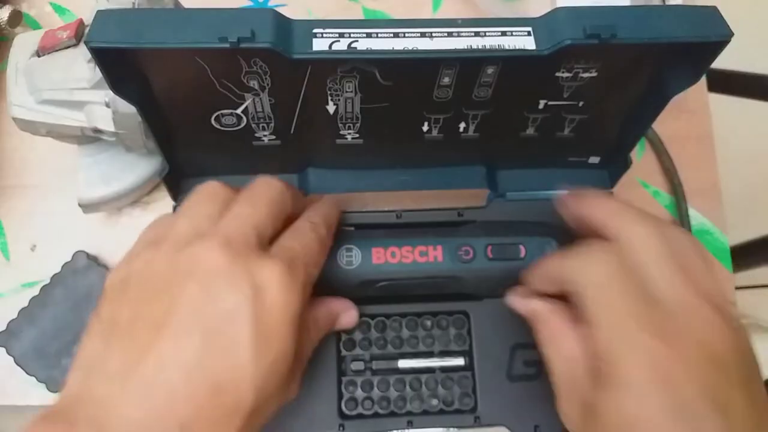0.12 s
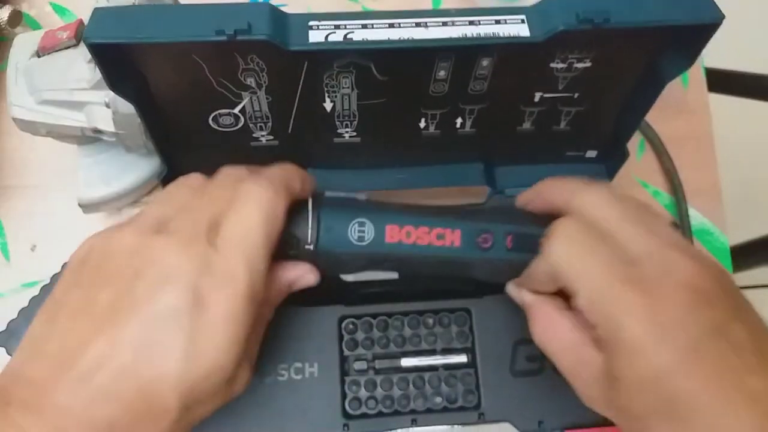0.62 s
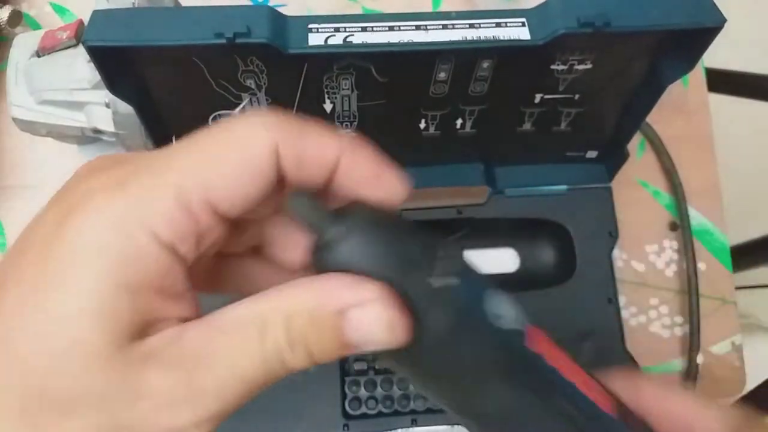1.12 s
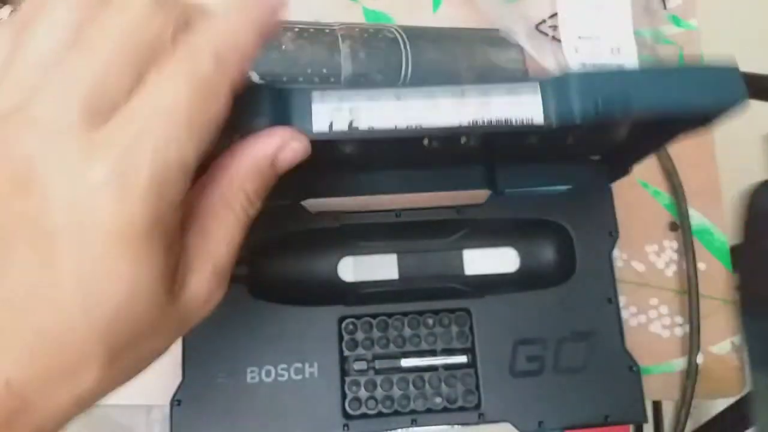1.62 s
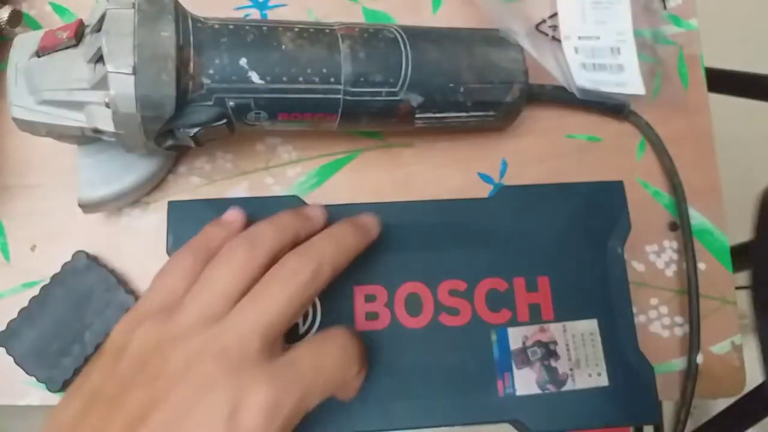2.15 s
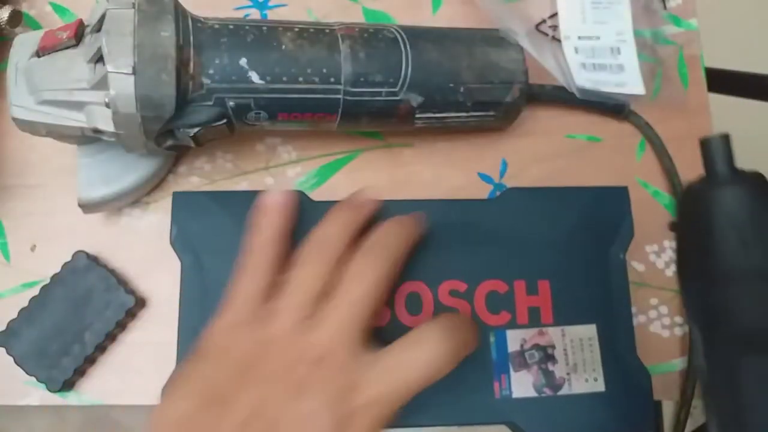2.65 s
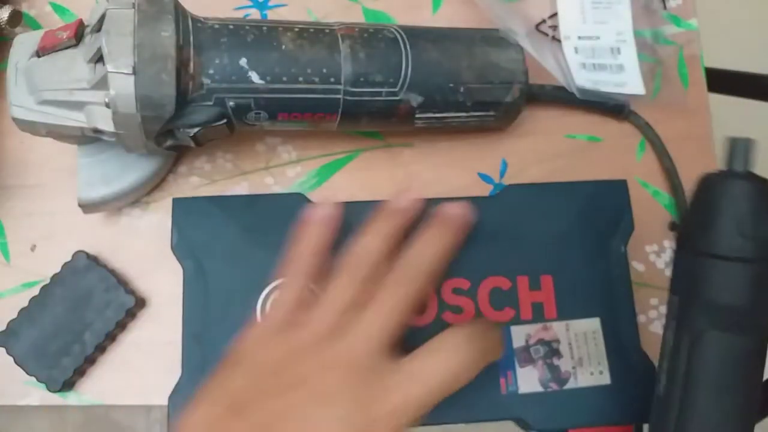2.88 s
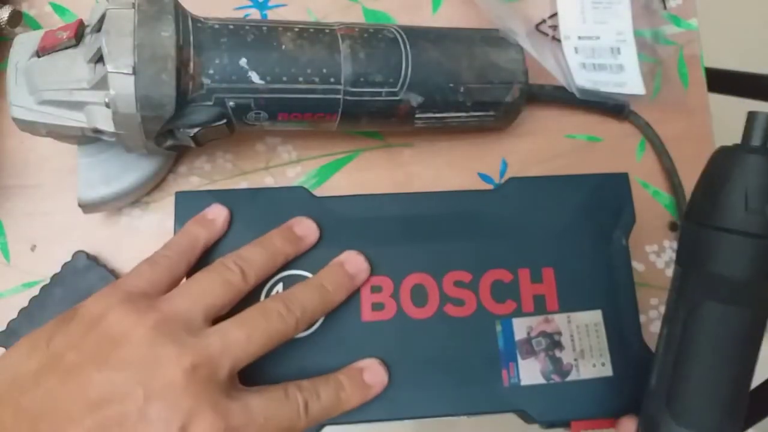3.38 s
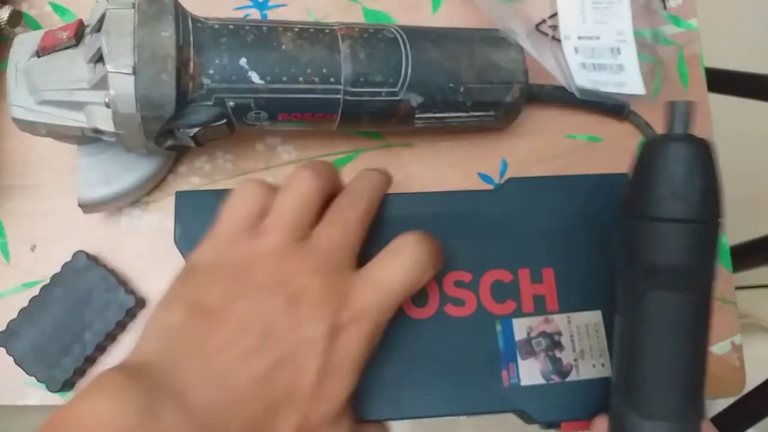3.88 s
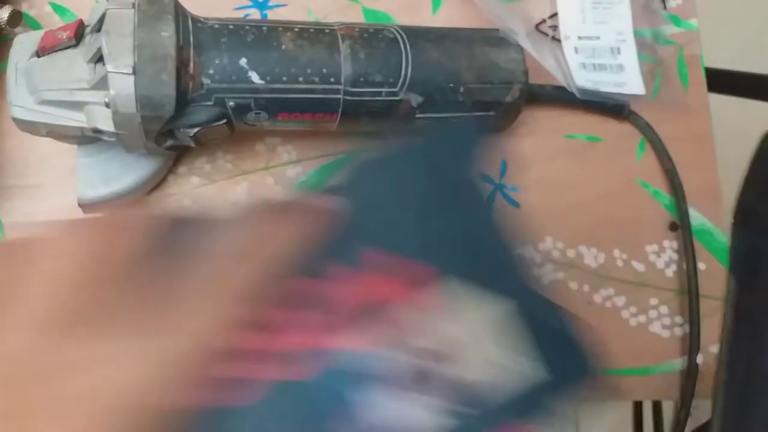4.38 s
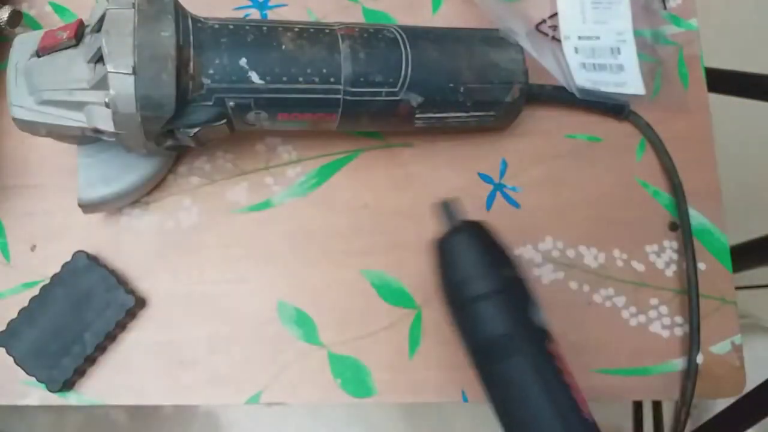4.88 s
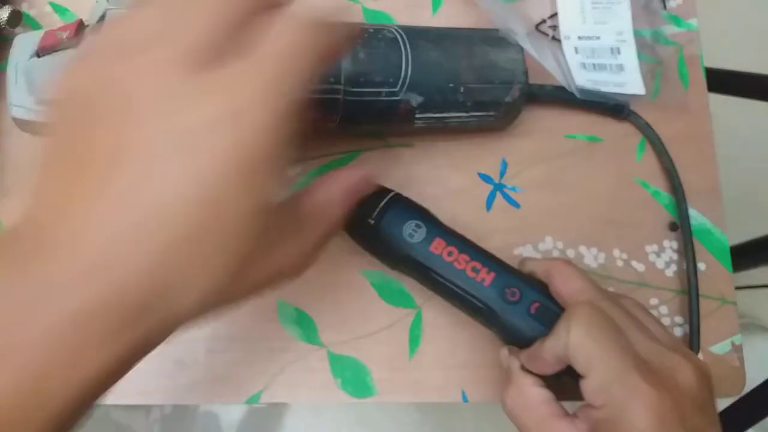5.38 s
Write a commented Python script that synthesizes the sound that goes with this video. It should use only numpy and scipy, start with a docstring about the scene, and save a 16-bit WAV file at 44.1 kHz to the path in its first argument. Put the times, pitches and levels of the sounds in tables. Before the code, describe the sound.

Quiet plastic rustling and small clicks come first, with barely audible thin tones. Then the case lid claps shut, the loudest hit, with a short woody thump. Sparse taps and scuffs lead to a crisp latch snap, a cluster of small clicks as the case is moved away, and two separate knocks on the wooden table. Dry, close phone sound with short room reflections and faint hiss.

```python
"""Handling a hard tool case

A hard plastic tool case is emptied, shut, latched and moved on a wooden table, close to a phone microphone.
Blows and thumps excite damped modes of the case and the table top; scrapes are clumped noise coloured by
the surfaces; rubbing hands and the hiss of the room are shaped noise with drifting patches.
Thin sines waver at the start, a faint stack of overtones squeaks near the end, and sparse decaying
reflections form the answer of a small room."""
import sys
import numpy as np
from scipy import signal
from scipy.fft import rfft, irfft
from scipy.io import wavfile
from scipy.ndimage import uniform_filter1d

SR = 44100
rng = np.random.default_rng(int(sys.argv[2]) if len(sys.argv) > 2 else 0)


def boost_factor(decibels):
    """Convert a level in decibels to a linear amplitude factor."""
    exponent = np.asarray(decibels, float) / 20
    return 10 ** exponent


def dump(signal):
    """Clip the signal to [-1, 1] and save it as 16-bit WAV at the path in sys.argv[1]."""
    limited = np.clip(np.atleast_2d(signal).T, -1, 1)
    pcm = np.round(limited * 32767).astype(np.int16)
    wavfile.write(sys.argv[1], SR, pcm)


N = 243431  # length in samples

# blows on the case: start_s, level_db, treble tick re blow tick_db, centre of the contact centre_hz, ring_t60_s
BLOWS = [(.105, -41, -23, 870, 0.12), (.391, -30.5, -3, 550, 0.043), (.483, -37, -5, 1410, 0.041),
         (0.52, -42, -4, 2000, 0.053), (.764, -47.5, 7.5, 1540, .11), (.979, -47.5, -25, 748, 0.41),
         (1.416, -38.5, -3.5, 2190, 0.05), (1.502, -28.5, -13, 3760, 0.093), (1.978, -25.5, -27, 900, 0.05),
         (1.991, -10.5, -2.5, 4070, .035), (2.000, 5.5, -41, 1580, 0.014), (2.003, -1.5, -26, 770, 0.029),
         (2.008, -20, -30, 980, 0.031), (2.018, -24, -25, 580, 0.039), (2.033, -25, -40, 1100, .1),
         (2.048, -23, -25, 810, 0.053), (2.241, -41.5, -2, 620, 0.19), (2.312, -21.5, -2, 1980, 0.033),
         (2.530, -42, -10, 3770, .04), (2.795, -41.5, -18, 504, 0.06), (3.124, -17, -11.5, 3300, 0.018),
         (3.126, -18.5, -30, 940, 0.024), (3.4, -40.5, -10, 2550, 0.026), (3.515, -24.5, -19, 1400, 0.036),
         (3.522, -24, -8, 2650, 0.051), (3.526, -30, -30, 920, 0.028), (3.694, -22, -10, 950, 0.02),
         (3.954, 2.5, -7.5, 2350, 0.034), (3.956, -18, 2, 1370, 0.11), (4.012, -18, -11, 1300, 0.041),
         (4.017, -18.5, -21, 2680, 0.053), (4.147, -48, -22, 1170, 0.057), (4.208, -36, -15, 4500, 0.023),
         (4.217, -30.5, -11.5, 910, 0.058), (4.217, -29, -20, 2200, .07), (4.24, -36, -21, 2520, 0.044),
         (4.264, -30, -2, 990, .06), (4.277, -26, -8, 2780, 0.026), (4.28, -15, -5, 3560, 0.023),
         (4.318, -18, -6, 2650, 0.014), (4.340, -33, 2, 3180, 0.045), (4.354, -32, -17, 3000, 0.034),
         (4.369, -34, -20, 5000, 0.025), (4.395, -38, -14, 2520, 0.048), (4.453, -44, -22, 2560, .05),
         (4.652, -31.5, -6.5, 3860, 0.042), (4.752, -11.5, -22, 880, 0.033),
         (4.752, -13, -14.5, 2400, 0.066), (4.76, -19.5, -14, 1150, 0.06), (4.831, -17, -30, 2340, 0.016),
         (4.831, -21.5, -40, 810, 0.036), (4.84, -29, -23, 1090, 0.033), (4.856, -24.5, -21, 540, 0.026),
         (5.383, -11, -6.5, 1500, 0.034), (5.387, -25, -14, 3700, 0.026), (5.4, -26.5, -23, 1300, 0.15)]
# scrapes of plastic on plastic or skin: start_s, length_s, level_db, centre_hz, spread_octaves
SCRAPES = [(0.058, 0.086, -60.5, 4200, 0.16), (0.171, 0.05, -50.5, 1300, 1.76),
           (0.358, 0.037, -56, 610, 0.55), (0.453, 0.047, -53, 1200, 1), (0.241, 0.03, -52.5, 6000, 1.8),
           (0.562, 0.033, -46, 3460, 1.9), (1.483, 0.039, -45.5, 3800, 1.8), (1.592, 0.034, -48, 8040, 1.5),
           (1.683, 0.037, -44.5, 10200, .8), (1.874, 0.12, -49.5, 6240, 1.4),
           (2.013, 0.092, -47, 2480, 1.6), (2.273, 0.047, -40, 2460, 1.6), (2.282, 0.014, -39, 2950, 0.11),
           (2.293, 0.023, -39.5, 1300, 0.65), (2.398, 0.023, -52.5, 1770, 1.4),
           (2.518, .016, -50.5, 9000, 1.5), (2.586, 0.16, -57, 7060, 0.7), (2.756, 0.043, -51, 11100, .66),
           (2.887, 0.11, -49.5, 10300, 1), (3.059, 0.085, -51, 1070, 1.4), (3.18, 0.033, -56, 12000, .3),
           (3.359, 0.043, -52.5, 7360, 0.19), (3.575, 0.015, -50, 8000, 1.7), (3.648, 0.012, -47, 4240, 1),
           (3.752, 0.037, -34.5, 1850, 0.69), (3.757, 0.045, -28.5, 970, 0.36),
           (3.806, 0.017, -42, 1070, 0.59), (3.834, 0.09, -49, 1080, 0.8), (3.907, 0.0092, -44, 1570, 0.77),
           (3.947, 0.046, -32.5, 1940, 1.5), (3.971, 0.073, -44, 3000, 1.4),
           (4.001, 0.031, -36.5, 1170, 0.22), (4.269, 0.028, -47, 5000, 0.93),
           (4.337, .066, -57.5, 3930, 0.32), (4.946, 0.054, -61.5, 9000, .54),
           (5.384, 0.032, -54, 1800, 0.28)]
# modes of the case: mode_hz, relative level_db, t60 as a share of the blow's ring t60_ratio
CASE_MODES = [(419.6, 18, 1.25), (600, -17, 0.43), (774, 20, 1.3), (834, 24, 0.55), (985, 15, 0.81),
              (1120, 1, 2.8), (1200, -8.5, 1.2), (1297, -8.5, 1.56), (1300, -11, 3), (1420, 19, 0.54),
              (1626, -17, 0.74), (1990, -6.5, 1), (2082, 19, 1.4), (2227, -16.5, 0.5), (2560, 42, 0.09),
              (3280, 40.5, 0.17), (3380, -18.5, .7), (4280, 14, 1.3), (4870, 18, 0.26)]
# modes of the table top: mode_hz, relative level_db, free t60_s
TABLE_MODES = [(128, -5.5, 0.39), (160.4, 6, 0.12), (214, 2.5, 0.11), (232.8, 3.5, 0.13), (283.6, 5, 0.12),
               (357.3, 5.5, 0.12), (405, 4.5, 0.11)]
# thumps on the table top: start_s, peak_db, pitch of the leading modes spot_hz,
# share of the free ring left by the hands ring_ratio
THUMPS = [(0.766, -41, 166, 0.88), (1.501, -21.5, 133, 0.62), (1.98, -33, 292, 0.87),
          (2.000, -20.5, 290, 0.43), (2.031, -48, 297, 0.57), (2.24, -40, 290, 0.87),
          (2.61, -43.5, 270, 0.38), (2.795, -41.5, 275, 0.43), (2.867, -38.5, 260, 0.39),
          (3.693, -24.5, 182, 0.28), (4.012, -35, 258, 0.35), (4.217, -27.5, 290, 0.52),
          (4.28, -31, 297, 0.45), (4.752, -20.5, 267, 0.5), (4.83, -24.5, 283, 0.32),
          (4.856, -33, 296, 0.3), (5.384, -11.5, 265, 0.29), (5.4, -23, 243, 0.61)]
# pressure of the hands on the case: time_s, rubbing level_db
HAND_PRESSURE = [(0.0, -53.5), (.38, -51), (.7, -53), (1.38, -55.5), (1.55, -49.5), (1.75, -54.5),
                 (1.94, -54), (2.08, -50), (2.3, -50), (2.54, -53), (3.01, -52.5), (3.44, -55.5),
                 (3.95, -46.5), (4.2, -56.5), (4.35, -51), (4.46, -62), (4.9, -62.5), (5.52, -56)]
# relative spectra of the dull rub, the finger hiss, the table rumble, the room hiss and the tick of a blow:
# frequency_hz, density_db (per Hz)
RUB_SPECTRUM = [(90, -44), (150, -1), (300, 1), (600, -3.5), (1800, -8), (5500, -13.5), (9000, -19.5),
                (16000, -15)]
FINGER_HISS_SPECTRUM = [(2000, -9), (4000, 3), (8000, -15), (12000, 3), (16000, -9.5)]
RUMBLE_SPECTRUM = [(30, -40), (50, -36), (80, 4.5), (125, 5.5), (180, -37), (300, -49)]
AIR_SPECTRUM = [(40, 2), (90, -0.5), (300, -11.5), (1000, -3.5), (3000, -10), (7000, -15.5), (12000, -26),
                (16000, -17)]
TICK_SPECTRUM = [(2000, -47), (4000, 1), (7500, 3), (10000, 4), (16000, -1)]
# course of the squeak: time_s, fundamental pitch_hz, level_db
SQUEAK_COURSE = [(4.86, 694, -72), (4.93, 681, -71), (5.02, 658, -66), (5.1, 644, -67), (5.17, 634, -67),
                 (5.24, 642, -68), (5.34, 664, -73)]
# formant-like weighting of the squeak's overtones: frequency_hz, gain_db
SQUEAK_WEIGHTING = [(2600, -18), (3300, 3), (3900, -5), (4600, -6), (5200, 0), (5800, -6), (6500, -7),
                    (7200, -13), (8000, -15)]
# thin wavering tones, perhaps loose steel bits: start_s, length_s, first_hz, last_hz, level_db
BIT_TONES = [(.07, .09, 4000, 4000, -68), (.08, .07, 4404, 4404, -66), (.16, .09, 5700, 5700, -64),
             (.15, .57, 2185, 2040, -61), (.28, .32, 5098, 5050, -65), (.28, .17, 9440, 9440, -68)]
# decay of the room: frequency_hz, t60_s
ROOM_DECAY = [(100, 0.57), (500, 0.28), (2000, 0.19), (6000, 0.23), (14000, 0.32)]
# response of the microphone: frequency_hz, gain_db
MICROPHONE_RESPONSE = [(25, -30), (45, -15), (75, 0), (7800, 0), (8800, -9), (15500, -9), (16800, -25),
                       (17500, -60)]


def evened(x):
    """Normalisation: scales a signal to unit rms."""
    return x / np.sqrt(np.mean(x ** 2) + 1e-20)


def read(points, hz):
    """Interpolation of a two-column curve along a log-frequency axis."""
    f, value = np.transpose(points)
    return np.interp(np.log(hz + 1), np.log(f + 1), value)


def add(mix, start_s, sound):
    """Superposition: adds a sound into the mix at its start, cut off at the end of the mix."""
    part = mix[round(start_s * SR):][:len(sound)]
    part += sound[:len(part)]


def bell_db(hz, centre_hz, octaves):
    """Gaussian resonance on a log-frequency axis, its standard deviation in octaves."""
    return -4.3 * (np.log2((hz + 1) / centre_hz) / octaves) ** 2


def coloured(x, spectrum_db):
    """Linear filtering: weights the spectrum of x by a function of frequency that returns dB."""
    hz = np.fft.rfftfreq(len(x), 1 / SR)
    return irfft(rfft(x) * boost_factor(spectrum_db(hz)), len(x))


def ring(modes, t, phases):
    """Modal superposition: a sum of exponentially damped sines with columns mode_hz, level_db, t60_s."""
    hz, db, t60 = (column[:, None] for column in modes)
    decay = boost_factor(db - 60 * t / t60)
    return (decay * np.sin(2 * np.pi * hz * t + phases[:, None])).sum(0)


def noise_bed(spectrum, patchy_db):
    """Gaussian noise from random short-time spectra, with patches that drift in level; unit rms."""
    frames = N // 256 + 5
    hz = np.fft.rfftfreq(1024, 1 / SR)
    real, imaginary, patches = rng.standard_normal((frames, 513, 3)).T
    patches = uniform_filter1d(patches, size=14, axis=0)  # across frequency
    patches = evened(uniform_filter1d(patches, size=8, axis=1))  # across time
    gain = boost_factor(read(spectrum, hz)[:, None] + patchy_db * patches)
    bed = signal.istft((real + 1j * imaginary) * gain, nperseg=1024, noverlap=768)[1]
    return evened(bed[:N])


def background():
    """Stationary shaped noise: the even hiss of the room."""
    return boost_factor(-59.5) * noise_bed(AIR_SPECTRUM, patchy_db=2.0)


def hands():
    """Sliding friction: hand pressure drives a dull rub, a finger hiss and a lumpy rumble through the table."""
    rub_db = np.interp(np.arange(N) / SR, *np.transpose(HAND_PRESSURE))
    excess_db = rub_db + 54  # above the usual pressure
    hiss_db = -64.5 + 1.5 * excess_db
    rumble_db = -57 + 0.72 * excess_db
    flicker = boost_factor(1.14 * evened(uniform_filter1d(rng.standard_normal(N), size=400)))
    rub = boost_factor(rub_db) * noise_bed(RUB_SPECTRUM, patchy_db=1.5)
    hiss = boost_factor(hiss_db) * noise_bed(FINGER_HISS_SPECTRUM, patchy_db=1.5)
    rumble = boost_factor(rumble_db) * noise_bed(RUMBLE_SPECTRUM, patchy_db=2.3)
    return flicker * (rub + hiss) + rumble


def squeak():
    """Harmonic series: overtones 4 to 12 of a gliding fundamental, each fluttering; returns start and sound."""
    time_s, *columns = np.transpose(SQUEAK_COURSE)
    t = np.arange(time_s[0], time_s[-1], 1 / SR)
    pitch_hz, level_db = (np.interp(t, time_s, column) for column in columns)
    turns = np.cumsum(pitch_hz) / SR
    flutter = uniform_filter1d(rng.standard_normal((SR, 9)), size=700, axis=0)[:len(t)].T
    tones = np.zeros(len(t))
    for k in range(4, 13):
        overtone_db = read(SQUEAK_WEIGHTING, k * pitch_hz) + 4.5 * evened(flutter[k - 4])
        tones += boost_factor(overtone_db) * np.sin(2 * np.pi * k * turns + k * k)  # k * k spreads the phases
    return time_s[0], boost_factor(level_db) * tones * signal.windows.tukey(len(t), .2)


def bit_tone(row, chance):
    """Modulated sine: a thin tone that wavers in strength and bends in pitch towards its end."""
    _, length_s, first_hz, last_hz, level_db = row
    t = np.arange(round(length_s * SR)) / SR
    hz = first_hz + (last_hz - first_hz) * (t / length_s) ** 5
    waver = boost_factor(3 * evened(uniform_filter1d(chance, size=1500))[:len(t)])
    tone = np.sin(2 * np.pi * np.cumsum(hz) / SR)
    return boost_factor(level_db) * waver * tone * signal.windows.tukey(len(t), .3)


def scrape(row, noise, slips):
    """Stick-slip friction: uneven slips, clumped in time, excite the surfaces while the table rumbles along."""
    _, length_s, level_db, centre_hz, octaves = row
    t = np.arange(len(noise)) / SR
    grip = boost_factor(1.53 * evened(uniform_filter1d(slips, size=120)))
    crackle = 1 + 3 * (slips > 2.3)  # now and then a bigger slip
    case_hz = np.transpose(CASE_MODES)[0]

    def colour(f):
        """Resonance: the case favours its modes within the scrape's band, above a faint treble floor."""
        body_db = 5.6 * np.exp(-((f[:, None] - case_hz) / 40) ** 2).sum(1)
        band_db = bell_db(f, centre_hz, max(octaves, .05)) + body_db
        return np.maximum(band_db, -30 + read(TICK_SPECTRUM, f))

    surface = evened(coloured(noise * grip * crackle, colour))
    wood = evened(coloured(noise * grip, lambda f: bell_db(f, 245, 0.71)))
    wood_db = -9.5 - 2.5 * np.log2(centre_hz / 1000)  # a lower scrape moves the table more
    onset = np.clip(t / 0.0015, 0, 1)
    release = boost_factor(-60 * np.maximum(t - length_s, 0) / 0.05)
    return boost_factor(level_db) * (surface + boost_factor(wood_db) * wood) * onset * release


def thump(row):
    """Plate modes near the struck spot; the heavy top moves late, and the thump carries no deep bass below its
    leading modes."""
    _, peak_db, spot_hz, ring_ratio = row
    t = np.arange(12000) / SR
    hz, db, t60 = np.transpose(TABLE_MODES)
    modes = (hz, db + bell_db(hz, spot_hz, 0.37), t60 * max(ring_ratio, .1))
    inertia = 1 - np.exp(-(t / 0.002) ** 2)
    wood = ring(modes, t, 0 * hz) * inertia
    highpass = signal.butter(2, spot_hz / 2, 'high', fs=SR, output='sos')
    wood = signal.sosfilt(highpass, wood)
    return boost_factor(peak_db) * wood / abs(wood).max()


def blow(row, chance, noise):
    """Impact excitation: a contact pulse, case modes near its pitch, loose rattle and a treble tick."""
    _, level_db, tick_db, centre_hz, t60 = row
    t = np.arange(len(noise)) / SR
    t60 = np.clip(t60, .01, .4)
    reach = .3 + .45 * np.clip(1 + level_db / 30, 0, 1)  # octaves: harder blows wake more modes
    touch = np.clip(t / .001, 0, 1) ** 2  # contact builds up within a millisecond

    hz, db, ratio = np.transpose(CASE_MODES)
    place_db = 6.9 * chance[:len(CASE_MODES)]  # each blow lands on another spot
    modes = (hz, db + place_db + bell_db(hz, centre_hz, reach), ratio * t60)
    case = ring(modes, t, 1.7 * chance[-len(CASE_MODES):])

    cycles = (t - .0015) * centre_hz
    push_pull = -np.sin(2 * np.pi * cycles) * np.exp(-(cycles * reach / .35) ** 2)  # the contact itself
    snap = 0.61 * touch * push_pull + .5 * touch * case / abs(case).max()

    rattle = evened(coloured(noise, lambda f: bell_db(f, centre_hz, 1.5 * reach)))
    rattle = rattle * boost_factor(-13.0 - 60 * t / (1.43 * t60))
    tick = evened(coloured(noise[::-1], lambda f: read(TICK_SPECTRUM, f)))
    tick = tick * (boost_factor(-60 * t / 0.0067) + boost_factor(-9 - 60 * t / t60))  # sharp start, fainter tail
    return boost_factor(level_db) * (snap + touch * (rattle + boost_factor(tick_db) * tick))


def room(x):
    """Reverberation: sparse reflections of random sign, each frequency band decaying at its own rate."""
    taps = np.zeros(SR // 2)
    at = np.arange(200, len(taps) - 20, 20)
    taps[at + rng.integers(0, 20, len(at))] = rng.choice([-1., 1.], len(at))
    hz, t, z = signal.stft(taps, SR, nperseg=256)
    decay = boost_factor(-60 * t / read(ROOM_DECAY, hz)[:, None])
    tail = signal.istft(z * decay, SR, nperseg=256)[1]
    return signal.fftconvolve(x, tail / np.linalg.norm(tail))[:N]


def scene():
    """Superposition of the beds, the close events and the room's answer to those events."""
    bed = background() + hands()
    add(bed, *squeak())
    for row in BIT_TONES:
        add(bed, row[0], bit_tone(row, rng.standard_normal(SR)))
    near = np.zeros(N)
    for row in SCRAPES:
        add(near, row[0], scrape(row, *rng.standard_normal((2, 12000))))
    for row in THUMPS:
        add(near, row[0], thump(row))
    for row in BLOWS:
        add(near, row[0], blow(row, rng.standard_normal(2 * len(CASE_MODES)), rng.standard_normal(12000)))
    return (bed + near + boost_factor(-8) * room(near))[None]


def band_limit(x):
    """A steep low-pass at the top of the band."""
    return signal.sosfilt(signal.butter(12, 17000, fs=SR, output="sos"), x)


def record(dry):
    """Minimum-phase microphone response, without deep bass and stepping down above 8 kHz, then soft clipping."""
    hz = abs(np.fft.fftfreq(8192, 1 / SR))
    log_gain = np.log(boost_factor(read(MICROPHONE_RESPONSE, hz)))
    phase = -signal.hilbert(log_gain).imag  # makes the response causal
    response = np.fft.ifft(np.exp(log_gain + 1j * phase)).real[:4096]
    heard = signal.fftconvolve(dry, response[None])[:, :N]
    over = np.maximum(abs(heard) - .7, 0)  # the input stage rounds off the loudest swings
    heard = heard - np.sign(heard) * (over - .26 * np.tanh(over / .26))
    return band_limit(heard)


dry = scene()
out = record(dry)
dump(out)
```